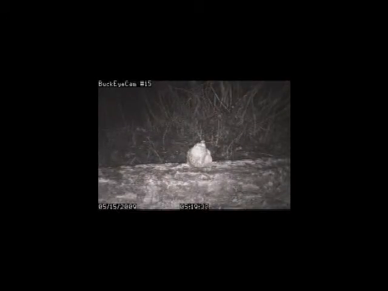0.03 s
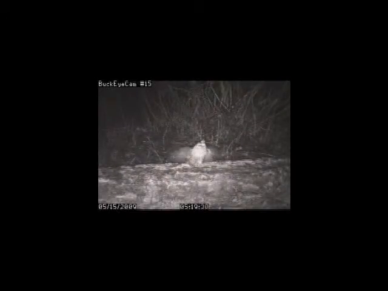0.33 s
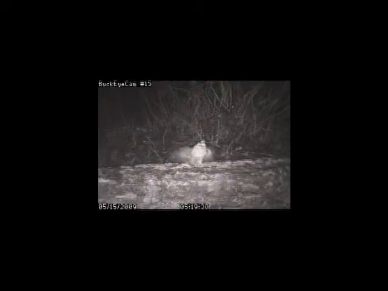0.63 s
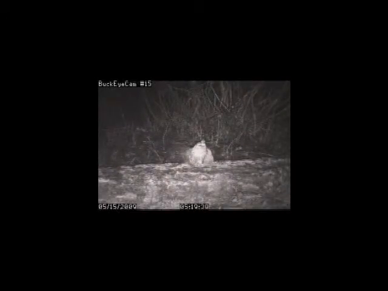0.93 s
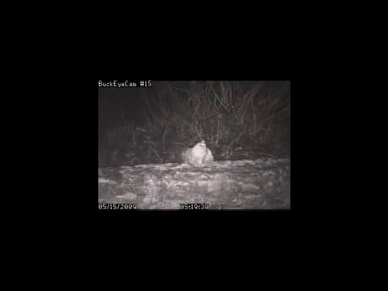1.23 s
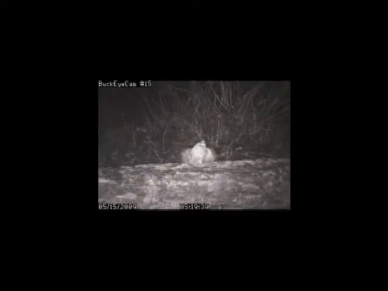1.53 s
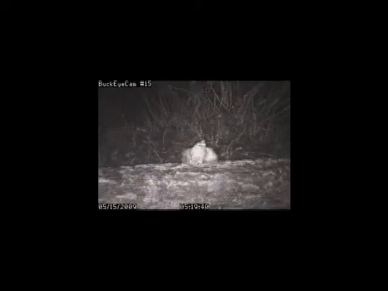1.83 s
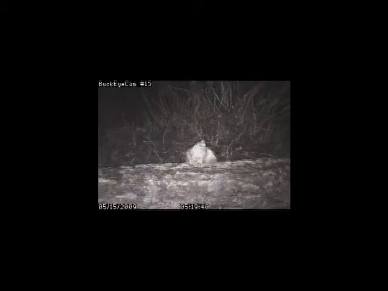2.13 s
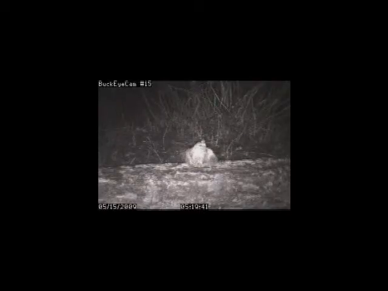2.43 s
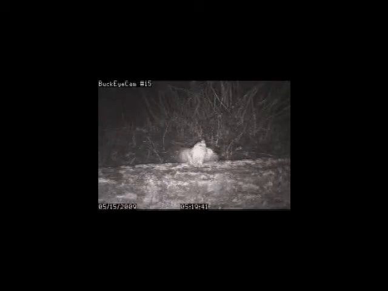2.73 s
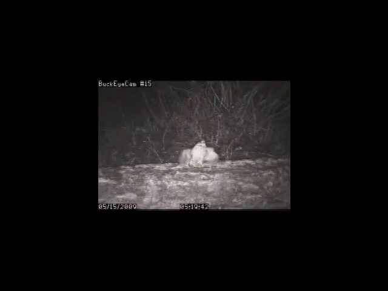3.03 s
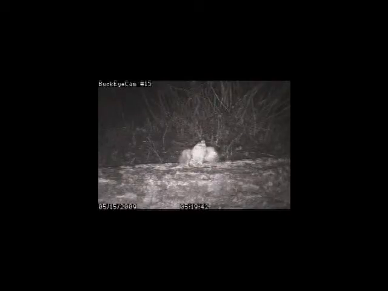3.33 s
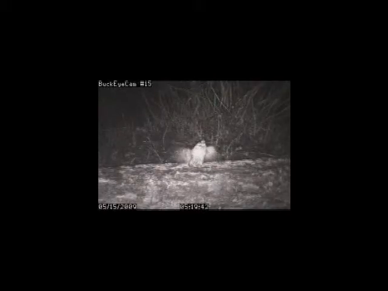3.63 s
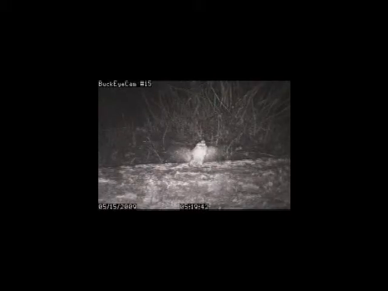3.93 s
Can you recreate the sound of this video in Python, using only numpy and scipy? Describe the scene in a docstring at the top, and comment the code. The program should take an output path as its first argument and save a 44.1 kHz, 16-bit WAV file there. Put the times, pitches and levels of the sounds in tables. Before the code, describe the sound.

Deep, dull wing beats of a grouse come ever faster over a low night rumble.

```python
"""A low, steady night rumble; the microphone keeps little of it above 700 Hz.
At 0.15 s a grouse starts drumming on a log close by: each wing beat pushes out one deep pulse of air.
The wood hums and echoes faintly after each; between some slow beats the wings settle with a soft puff.
The beats come ever faster, then weaken as they run into a roll near 4 s."""
import sys
import numpy as np
from scipy import signal
from scipy.fft import rfft, irfft
from scipy.io import wavfile
from scipy.ndimage import uniform_filter1d

SR = 44100
rng = np.random.default_rng(int(sys.argv[2]) if len(sys.argv) > 2 else 0)


def unload_wav(signal):
    """Save mono or channel-first audio to the path in sys.argv[1] as 16-bit WAV at rate SR, clipped to [-1, 1]."""
    wavfile.write(
        sys.argv[1],
        SR,
        np.round(np.clip(np.atleast_2d(signal).T, -1, 1) * 32767).astype(np.int16),
    )


N = 176400

# wing beats: centre_s, strength_db
WING_BEATS = [(0.1461, -9.0), (0.5438, -9), (0.901, -9), (1.2215, -8.5), (1.5119, -7.5), (1.773, -8),
              (2.0083, -8.5), (2.2214, -8.0), (2.417, -8), (2.5957, -8), (2.7602, -8), (2.9127, -8),
              (3.0544, -8), (3.184, -8), (3.304, -7.5), (3.4145, -8.5), (3.5175, -9), (3.6114, -10),
              (3.6971, -9), (3.7758, -10), (3.8461, -12), (3.9106, -10.5), (3.9712, -10.5)]


def amp(db):
    return 10 ** (np.asarray(db) / 20)


def unit_rms(x):
    return x / np.sqrt(np.mean(x ** 2) + 1e-20)


def air_puff(centre_s, level_db, stretch):
    """One smooth push of air with slight suction on either side; stretch > 1 slows it."""
    swing_hz, half_length_s = 50.1, 0.018  # at stretch 1
    t = (np.arange(N) / SR - centre_s) / stretch
    swell = np.cos(np.pi / 2 * t / half_length_s) ** 4 * (abs(t) < half_length_s)
    return amp(level_db) * swell * np.cos(2 * np.pi * swing_hz * t)


def wing_beats():
    """Each stroke pushes air, and a weaker, inverted pulse follows a moment later; after some slow beats the
    wings also settle."""
    # puffs of settling wings: centre_s, level_db
    settles = [(0.301, -30), (1.374, -40.5), (1.666, -44.5)]
    full_stroke_db, stretch_per_db, rebound_db = -8.5, 0.0234, -18.5
    out = np.zeros(N)
    for centre_s, strength_db in WING_BEATS:
        stretch = 1 + stretch_per_db * (full_stroke_db - strength_db)  # weaker is slower
        rebound_s = centre_s + 0.0181 * stretch
        out += air_puff(centre_s, strength_db, stretch)
        out -= air_puff(rebound_s, strength_db + rebound_db, stretch)
    for centre_s, level_db in settles:
        out -= air_puff(centre_s, level_db, stretch=1)
    return out


def wood_hum():
    """The surrounding wood rings low and faint after each beat."""
    pitch_hz, gain_db = 71, -27
    delay_s, rise_s, t60_s = 0.038, 0.01, 0.18
    out = np.zeros(N)
    for centre_s, strength_db in WING_BEATS:
        t = np.maximum(np.arange(N) / SR - centre_s - delay_s, 0)
        envelope = (1 - np.exp(-(t / rise_s) ** 2)) * np.exp(-np.log(1000) * t / t60_s)
        out += amp(strength_db + gain_db) * envelope * np.sin(2 * np.pi * pitch_hz * t)
    return out


def tree_echoes(source):
    """Trunks and ground scatter the sound into a weak, dense tail."""
    gain_db, rise_s, t60_s = -30.5, 0.03, 0.97
    t = np.arange(SR) / SR
    envelope = np.minimum(t / rise_s, 1) * np.exp(-np.log(1000) * t / t60_s)
    tail = rng.standard_normal(SR) * envelope
    return amp(gain_db) * signal.fftconvolve(source, tail / np.linalg.norm(tail))[:N]


def night_rumble():
    """Low rumble and dull rush, wavering in small patches; the microphone cuts the top steeply."""
    # rumble spectrum: freq_hz, relative_density_db
    spectrum = [(8, -12.5), (30, -0.5), (75, -1.5), (100, -8), (140, -13), (230, -13.5), (380, -13.5),
                (470, -16), (620, -17), (900, -17.5)]
    level_db, waver_db = -42.5, 0.5
    top_hz, falloff_hz, steepness = 566, 174.6, 2.58
    frame, hop = 2048, 512
    real, imag, patches = rng.standard_normal((3, N // hop + 5, frame // 2 + 1))
    patches = uniform_filter1d(patches, size=8, axis=0)  # over time
    patches = unit_rms(uniform_filter1d(patches, size=6, axis=1))  # over frequency
    frames = (real + 1j * imag) * amp(waver_db * patches)
    noise = signal.istft(frames.T, nperseg=frame, noverlap=frame - hop)[1][:N]
    bin_hz = np.fft.rfftfreq(N, 1 / SR)
    freq_hz, density_db = np.transpose(spectrum)
    colour = amp(np.interp(np.log(bin_hz + 1), np.log(freq_hz + 1), density_db))
    top_cut = np.exp(-(np.maximum(bin_hz - top_hz, 0) / falloff_hz) ** steepness)
    return amp(level_db) * unit_rms(irfft(rfft(noise) * colour * top_cut, N))


def scene():
    """Wing beats, their deepest bass lost in the microphone, in the night wood."""
    low_cut_hz = 26.5
    low_cut = signal.butter(3, low_cut_hz, "high", fs=SR, output="sos")
    beats = signal.sosfilt(low_cut, wing_beats())
    return (beats + wood_hum() + tree_echoes(beats) + night_rumble())[None]


def record(dry):
    """Samples up to one clock tick off time add faint buzz to loud slopes; then hiss, fades, low-pass."""
    clock_hz, hiss_db, fade_s, band_limit_hz = 48000, -92.5, 0.004, 16000
    n = np.arange(N)
    lag_samples = (n * clock_hz % SR) / clock_hz
    buzz = -lag_samples * np.gradient(dry, axis=1)
    hiss = amp(hiss_db) * rng.standard_normal(dry.shape)
    nearest_end_s = np.minimum(n, n[::-1]) / SR
    fades = np.sin(np.pi / 2 * np.minimum(nearest_end_s / fade_s, 1)) ** 2
    low_pass = signal.firwin(511, band_limit_hz, window=("kaiser", 9), fs=SR)
    return signal.oaconvolve((dry + buzz + hiss) * fades, low_pass[None], "same")


dry = scene()
out = record(dry)
unload_wav(out)
```